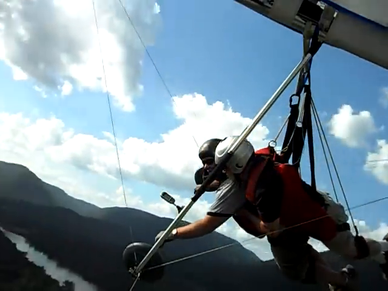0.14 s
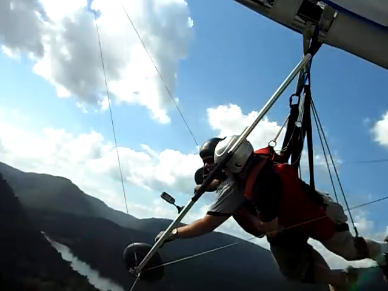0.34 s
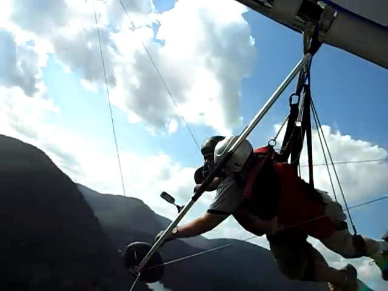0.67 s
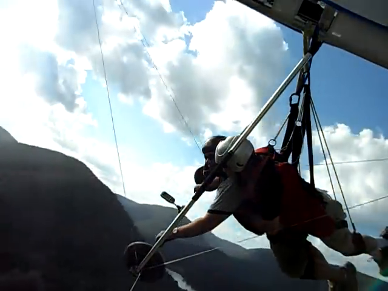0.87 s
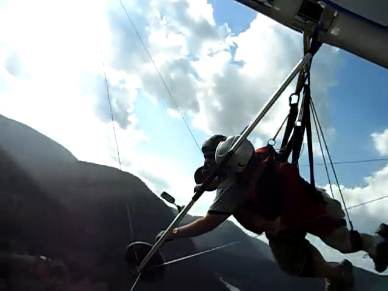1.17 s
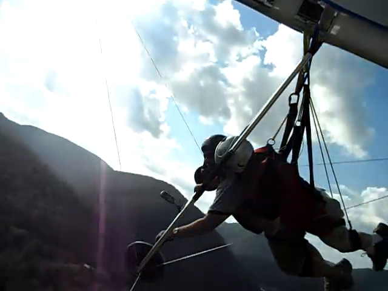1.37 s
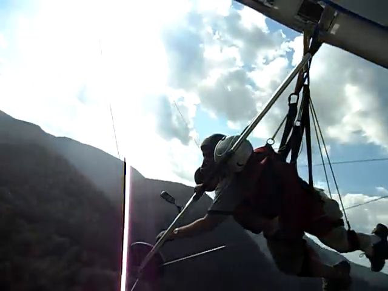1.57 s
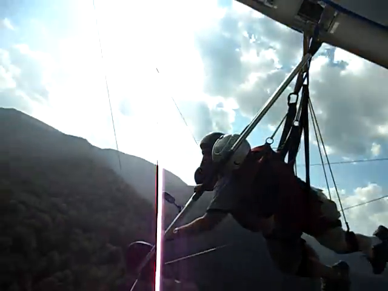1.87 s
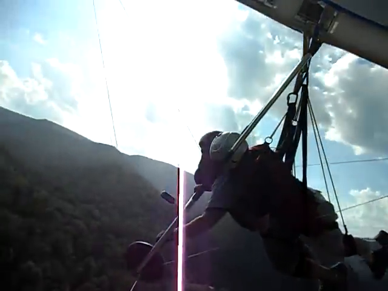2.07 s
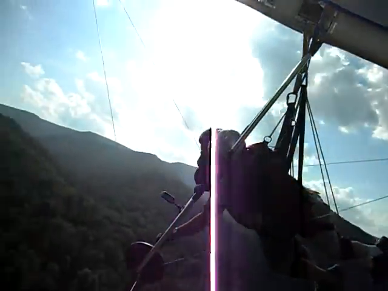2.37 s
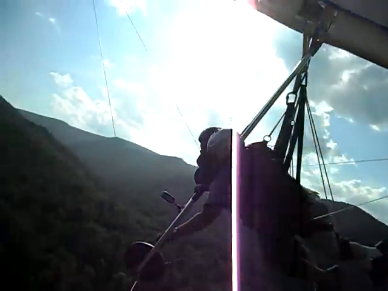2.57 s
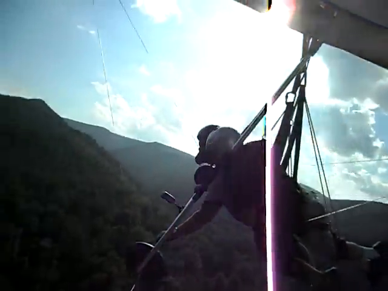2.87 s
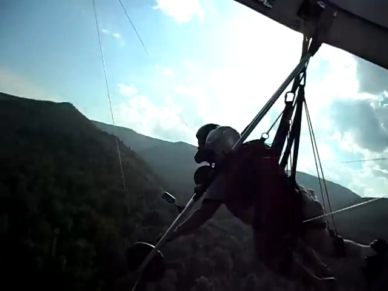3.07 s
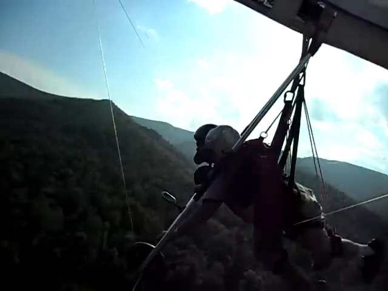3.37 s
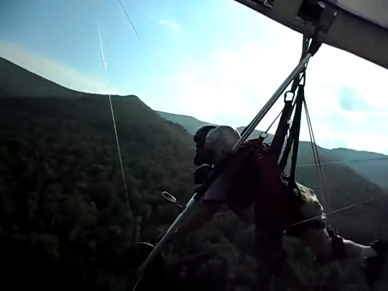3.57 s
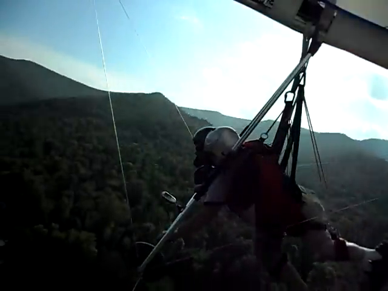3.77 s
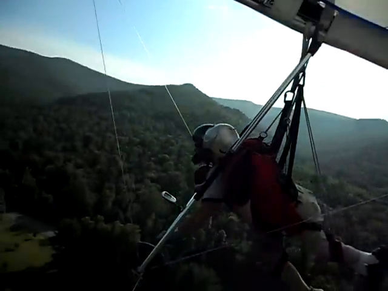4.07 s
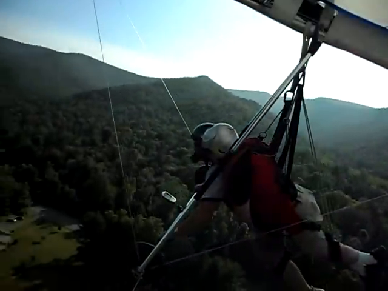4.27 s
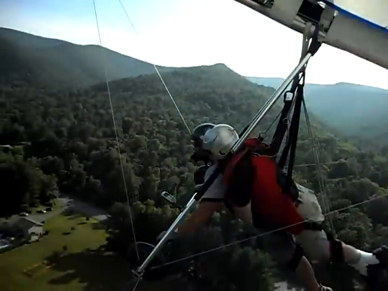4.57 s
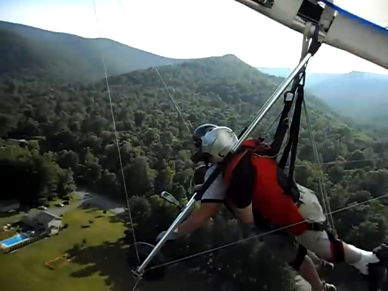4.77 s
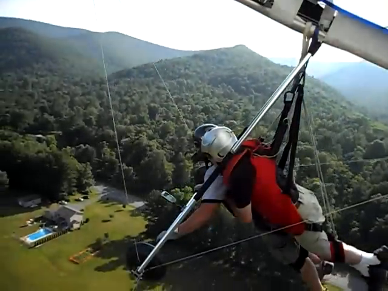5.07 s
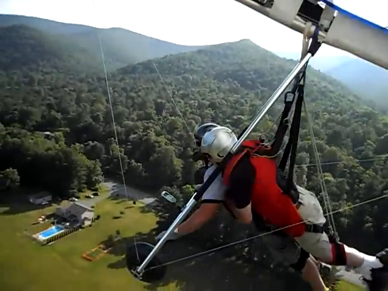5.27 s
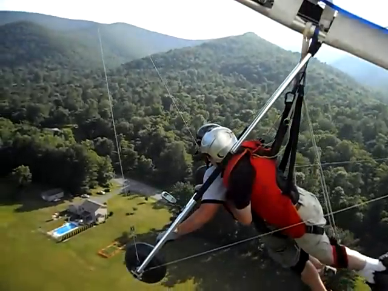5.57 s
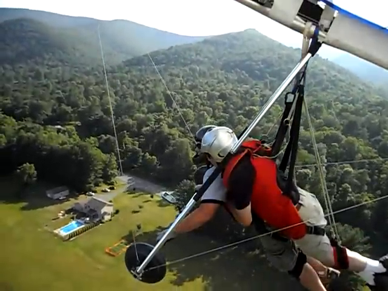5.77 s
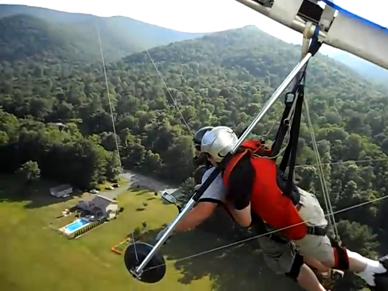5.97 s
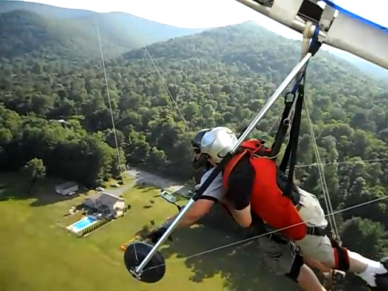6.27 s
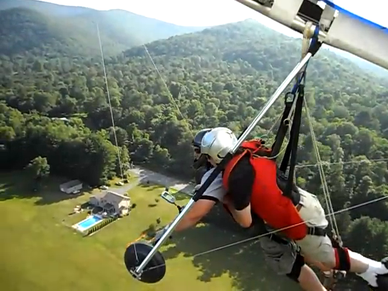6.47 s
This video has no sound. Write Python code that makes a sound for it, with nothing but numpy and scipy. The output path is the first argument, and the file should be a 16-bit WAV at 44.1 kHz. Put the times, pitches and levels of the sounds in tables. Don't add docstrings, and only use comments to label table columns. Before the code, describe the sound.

Two people fly under a hang glider above wooded hills, but only wind is heard. Fast air batters a small exposed microphone: deep lumpy rumbling, a fluttering hissing rush and faint crackle. It begins duller, brightens after the first second, then grows heavier and bassier past the middle, with brief dropouts before ending still blowing.

```python
import sys
import numpy as np
from scipy import signal
from scipy.fft import rfft, irfft, next_fast_len
from scipy.io import wavfile
from scipy.ndimage import uniform_filter1d, map_coordinates

SR = 44100
rng = np.random.default_rng(int(sys.argv[2]) if len(sys.argv) > 2 else 0)


def attenuation_scalar(level_db):
    decades = np.asarray(level_db, float) / 20
    return 10 ** decades


def store_pcm(level_fs):
    pcm = np.round(np.clip(level_fs, -1, 1) * 32767).astype(np.int16)
    wavfile.write(sys.argv[1], SR, np.atleast_2d(pcm).T)


N = 292439

# (time [s], brightness from air speed [dB], flow strength [dB], share of large wake eddies [dB])
FLIGHT = [(0, -22.5, -1, 2.5), (0.301, -22, 0.5, 0.5), (.75, -19, 0, -3), (1.2, -14, 0.5, -1),
          (1.6, -15, 0.5, 0), (2.05, -13.5, 1.5, -2), (2.2, -13, -0.5, 1.5), (2.62, -13, -3, -0.5),
          (2.9, -13, 1, 0.5), (3.45, -12, 1.5, 0), (3.73, -11, -1.5, 0.5), (3.95, -15, -1.5, 5),
          (4.4, -15, 0.5, 4.5), (4.75, -16, -2, 5.5), (5.3, -17, -0.5, 4.5), (5.9, -15, -0.5, 2),
          (6.15, -14, -0.5, 0), (6.63, -13, 1, -2)]
BRIGHT, FLOW, WAKE = 1, 2, 3
# (time [s], strength [dB], half length [s])
GUSTS = [(.29, 1, .04), (.56, 1, .04), (.955, 3.5, 0.014), (1.2, 2, 0.031), (1.455, 4, 0.025),
         (1.77, 2.5, .03), (2.08, 2, 0.02967), (2.28, 1.5, 0.033), (2.46, 2, 0.041), (2.83, 3, 0.039),
         (2.92, 2.5, 0.027), (3.2, 1, 0.028), (3.31, 2, 0.0392), (3.5, 1.5, 0.029), (3.605, 2.5, 0.02012),
         (3.655, 3.5, .02), (3.72, 4, 0.034), (4.13, 2, 0.0404), (4.27, 1, 0.059), (4.47, 2, .04),
         (4.8, 2, 0.022), (4.91, 2.5, 0.0399), (5.06, 4.5, 0.025), (5.175, 3, .03), (5.39, 3, 0.026),
         (6.07, 2.5, .03), (6.27, 2.5, .05), (6.45, 2, .04)]
# (time [s], depth [dB], return [s])
LULLS = [(.1, 2, .08), (.61, 2, .04), (1.0, 2.5, .07), (1.03, 2, .03), (1.55, 3, .03), (1.72, 3, .03),
         (1.82, 2, .03), (2.105, 4, .08), (2.31, 3, .02), (2.6, 2, .04), (3.36, 3, .03), (3.555, 2.5, .035),
         (3.745, 6, .04), (3.885, 2, .04), (4.73, 2, .03), (4.975, 4, .025), (5.21, 4, .1), (6.2, 2, .03),
         (6.49, 3, .04), (5.452, 8, .028), (5.57, 9, .035), (5.725, 7, .024), (5.85, 9, .036),
         (6.0, 6, .04), (6.025, 6, .03)]
# (time [s], rumble change [dB], half length [s])
SWELLS = [(.66, 3, 0.056), (.86, 2, 0.11), (1.02, 0, .06), (1.93, 3, 0.053), (2.45, 4, 0.048),
          (3.02, 2.5, .06), (3.21, -9, 0.055), (3.31, 2, 0.043), (3.51, -3, 0.035), (3.77, 9, 0.064),
          (3.9, -9, 0.048), (4.22, 1.5, 0.066), (4.66, 0.5, .04), (5.37, -1.5, 0.053), (5.65, 4, 0.019),
          (5.8, 5, .03), (5.94, 5, 0.038), (6.4, 3, 0.093)]
# (frequency [Hz], density [dB per Hz])
RUMBLE = [(10, -27.5), (25, -12), (50, -10.5), (85, -3.5), (130, -3.5), (200, -5.5), (300, -10.5),
          (500, -20), (900, -73)]
# (frequency [Hz], density [dB per Hz])
HEAVE = [(8, -24.5), (25, -4.5), (50, -3.5), (90, -5), (130, -13.5), (220, -59.5)]
# (frequency [Hz], density [dB per Hz])
RUSH = [(40, -28), (120, -12), (250, -3), (500, -5.5), (1000, -9), (1600, -14.5), (2500, -22), (4000, -42),
        (6300, -70), (10000, -83)]
# (frequency [Hz], density [dB per Hz])
CRACKLE = [(1000, -16.5), (2500, 6.5), (3500, 2.5), (5000, -5.5), (7000, -20), (9000, -29.5),
           (10500, -28.5), (11500, -70)]
# (time [s], tick peak [dB])
SURGES = [(0.3049, -42), (0.559, -44), (0.6025, -60), (0.7648, -52), (0.8317, -52), (0.8539, -45),
          (0.9656, -49), (0.9884, -45), (1.2415, -50), (1.324, -45), (1.4768, -40), (1.81, -50),
          (1.962, -43), (2.0849, -43), (2.2458, -54), (2.4932, -46), (3.1146, -45), (3.3191, -47),
          (3.7728, -41), (3.8284, -47), (4.1862, -50), (4.2941, -42), (4.335, -48), (4.5621, -43),
          (4.7966, -49), (5.1592, -46), (5.7959, -45), (6.4057, -51), (6.4393, -48), (6.4847, -41)]
# (time [s], snap peak [dB])
SNAPS = [(2.8433, -50), (2.902, -45), (2.9952, -44), (3.2674, -49), (3.4248, -49), (3.5885, -57),
         (3.6524, -49), (4.0757, -48), (4.1296, -44), (4.3036, -46), (4.5702, -47), (4.6654, -44),
         (4.7749, -50), (4.9054, -47), (5.0527, -49), (5.3815, -41), (5.4079, -50), (5.444, -47),
         (5.5332, -48), (5.6615, -48)]
# (time [s], level [dB])
HISS = [
    (0, -69.5),
    (.9, -72.5),
    (1.601, -83),
    (6.63, -84),
]

USUAL_BRIGHT_DB, DB_PER_OCTAVE = -14, 20
CEILING = .39
RUMBLE_DB, RUSH_DB, CRACKLE_DB = -26, -24.5, -62
RUMBLE_PER_FLOW, RUMBLE_PER_LULL, RUSH_PER_WAKE = 0.83, 1, -0.38
CRACKLE_PER_FLOW, CRACKLE_PER_WAKE, CRACKLE_PER_BRIGHT = 0.97, 1.36, 1.25
BRIGHT_PER_LULL, BRIGHT_PER_GUST = .4, .3


def evened(x):
    return x / np.sqrt(np.mean(x ** 2) + 1e-20)


def coloured(x, points):
    hz, db = np.transpose(points)
    size = next_fast_len(len(x))
    bins = np.fft.rfftfreq(size, 1 / SR)
    gain = attenuation_scalar(np.interp(np.log(bins + 1), np.log(hz + 1), db, right=-140))
    filtered = irfft(rfft(x, size) * gain, size)[:len(x)]
    return evened(filtered)


def wobble(low_hz, high_hz):
    points = [(0, -60), (low_hz / 2, -30), (low_hz, 0), (high_hz, -8), (high_hz * 2, -40)]
    return coloured(rng.standard_normal(N), points)


def add(mix, s, shape):
    start = round(s * SR) - len(shape) // 2
    mix[start:start + len(shape)] += shape


def bumps(rows, before=1):
    t = np.arange(0, N / SR + .001, .001)
    s, db, half = np.transpose(rows)[:, :, None]
    bell = np.exp(-((t - s) / np.maximum(half, .005)) ** 2)
    total = (db * np.where(t > s, 1, before) * bell).sum(0)
    return np.interp(np.arange(N) / SR, t, total)


def flight(column):
    rows = np.array(FLIGHT)
    return np.interp(np.arange(N) / SR, rows[:, 0], rows[:, column])


def lulls():
    return uniform_filter1d(bumps(LULLS, before=0), size=500)


def flow():
    return flight(FLOW) + bumps(GUSTS)


def brightness():
    return flight(BRIGHT) + BRIGHT_PER_GUST * bumps(GUSTS) - BRIGHT_PER_LULL * lulls()


def rumble(gust):
    lumps_db = .5 * gust + 1.0 * wobble(27, 50) - RUMBLE_PER_LULL * lulls()
    level_db = RUMBLE_DB + RUMBLE_PER_FLOW * flight(FLOW) + flight(WAKE) + bumps(SWELLS)
    slow_db = uniform_filter1d(level_db, size=20000)
    heave_db = 2.28 * (slow_db + 23) - 31.5
    heave = attenuation_scalar(heave_db) * coloured(rng.standard_normal(N), HEAVE)
    return attenuation_scalar(level_db + lumps_db) * coloured(rng.standard_normal(N), RUMBLE) + heave


def rush(gust, swing):
    row = coloured(rng.standard_normal(3 * N), RUSH)
    octaves = (brightness() - USUAL_BRIGHT_DB) / DB_PER_OCTAVE
    octaves = octaves + 0.03006 * gust + .14 * wobble(84, 500)
    place = np.cumsum(2 ** np.clip(octaves, -1.5, 1.5))
    swept = map_coordinates(row, [place], order=5)
    riding = 1 + 0.32 * uniform_filter1d(abs(swing), size=100)
    level_db = RUSH_DB + flow() + RUSH_PER_WAKE * flight(WAKE)
    flutter_db = 1.26 * gust + 2.26 * wobble(43, 600) - lulls() - 1.66
    return attenuation_scalar(level_db + flutter_db) * riding * swept


def crackle(gust, swing):
    size = attenuation_scalar(1.8 * np.minimum(rng.exponential(1, N), 5)) * rng.standard_normal(N)
    struck = rng.random(N) < 6000 / SR
    flutter = attenuation_scalar(2.0 * gust + 1.6 * wobble(55, 450))
    bursts = size * struck * flutter * (1 + 0.82 * abs(swing))
    level_db = (CRACKLE_DB + CRACKLE_PER_FLOW * flow() + CRACKLE_PER_WAKE * flight(WAKE)
                + CRACKLE_PER_BRIGHT * (flight(BRIGHT) - USUAL_BRIGHT_DB))
    return attenuation_scalar(level_db + 11.5 - 1.5 * lulls()) * coloured(bursts, CRACKLE)


def lopsided(air):
    return air + .55 * (air ** 2 - uniform_filter1d(air ** 2, size=2000))


def push_surges(air):
    t = np.arange(-200, 201) / SR
    push = .7 * np.exp(-(t / .0005) ** 2) + .3 * np.exp(-(t / .0012) ** 2)
    for s, db in SURGES:
        add(air, s, push * (CEILING - attenuation_scalar(db + 26) - air[round(s * SR)]))


def corners():
    t, out = np.arange(-200, 201) / SR, np.zeros(N)
    cusp = np.exp(-abs(t) / np.where(t < 0, .00014, .0003))
    step = np.tanh(t / .00005) * np.exp(-abs(t) / .00025)
    for s, db in SURGES:
        add(out, s, attenuation_scalar(db + 28) * cusp)
    for s, db in SNAPS:
        add(out, s, attenuation_scalar(db + 15) * step)
    return uniform_filter1d(out, size=2)


def scene():
    unsteadiness = attenuation_scalar(.5 * (flight(BRIGHT) - USUAL_BRIGHT_DB))
    gust = 0.745 * wobble(10, 45) * unsteadiness
    low = rumble(gust)
    air = low + rush(gust, evened(low))
    air = air + crackle(gust, evened(air))
    air = lopsided(air)
    push_surges(air)
    return air[None]


def band_limit(x):
    return signal.sosfilt(signal.butter(12, 10960, fs=SR, output="sos"), x)


def record(dry):
    held = dry / (1 + (dry / (1.15 * CEILING)) ** 6) ** (1 / 6)
    hiss_db = np.interp(np.arange(N) / SR, *np.transpose(HISS))
    hiss = attenuation_scalar(hiss_db) * rng.standard_normal(N)
    coupled = signal.lfilter(*signal.butter(1, 8, "high", fs=SR), held + corners() + hiss)
    band = signal.firwin(101, 10300, window=("kaiser", 9), fs=SR)
    padded = np.pad(coupled, [(0, 0), (50, 50)], "reflect", reflect_type="odd")
    limited = signal.oaconvolve(padded, band[None], "valid")
    limited = limited * np.minimum(np.arange(N)[::-1] / 60 + .05, 1)
    return band_limit(limited)


dry = scene()
out = record(dry)
store_pcm(out)
```